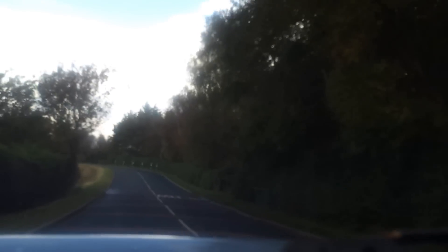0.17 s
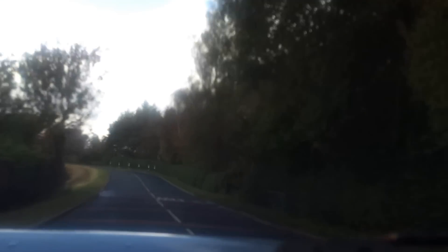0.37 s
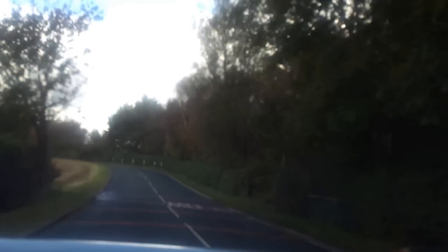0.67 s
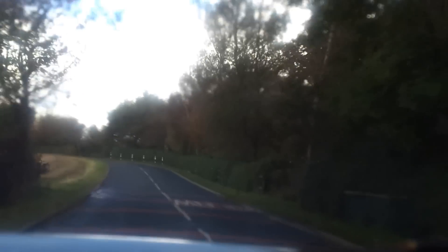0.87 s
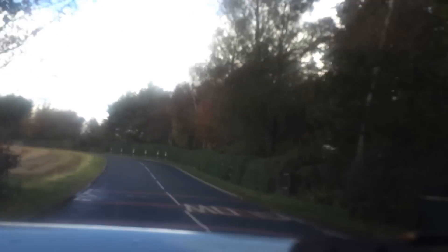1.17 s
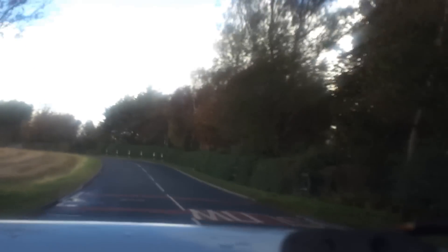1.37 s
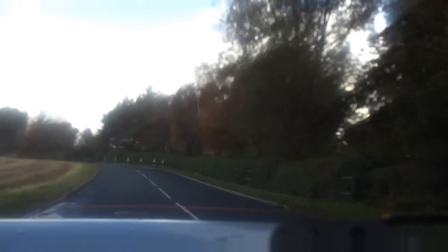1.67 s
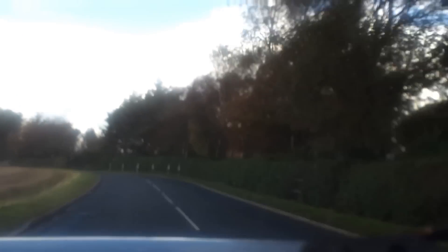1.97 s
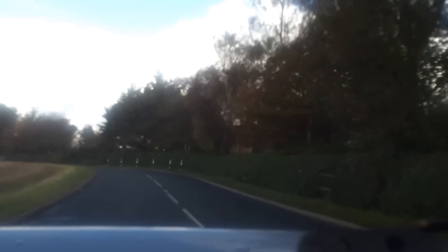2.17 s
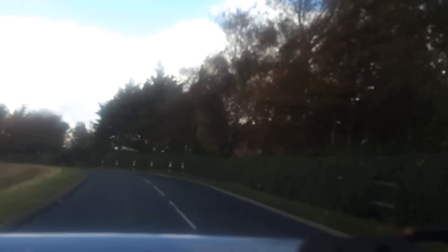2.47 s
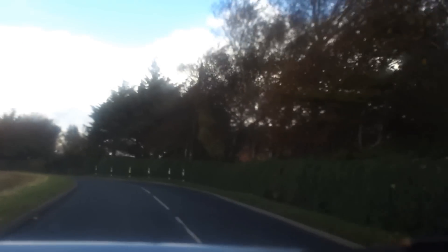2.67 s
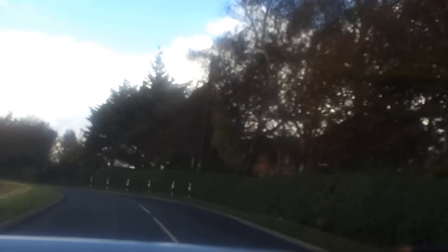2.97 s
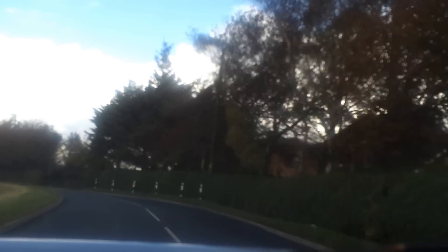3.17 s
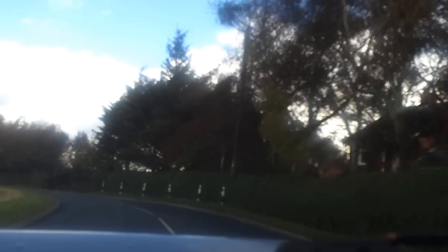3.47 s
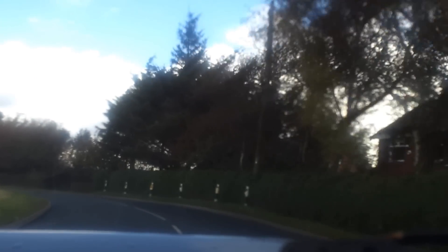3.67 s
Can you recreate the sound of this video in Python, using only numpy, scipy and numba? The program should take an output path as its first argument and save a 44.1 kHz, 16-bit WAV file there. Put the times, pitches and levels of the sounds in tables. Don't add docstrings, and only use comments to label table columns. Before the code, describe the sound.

Turbo air release inside a moving car: the engine pulls hard, a sagging whistle and hiss burst out, revs drop, the gearbox knocks, then steady cruising over tyre roar, heard by a camera microphone in the cabin.

```python
import sys
import numpy as np
from scipy import signal
from scipy.fft import rfft, irfft, next_fast_len
from scipy.io import wavfile
from scipy.ndimage import map_coordinates
from numba import njit

SR = 44100
rng = np.random.default_rng(int(sys.argv[2]) if len(sys.argv) > 2 else 0)


def invert_db(x):
    u = np.asarray(x, float) / 20
    return 10 ** u


def materialize(psi):
    bounded = np.clip(np.atleast_2d(psi).T, -1, 1)
    quanta = np.round(bounded * 32767).astype(np.int16)
    wavfile.write(sys.argv[1], SR, quanta)


N = 168903


@njit
def moving_bandpass(x, hz, width):
    y, b, l, g, k = np.empty(len(x)), 0., 0., 0., 0.
    for i in range(len(x)):
        if i == 0 or hz[i] != hz[i - 1]:
            g, k = np.tan(np.pi * hz[i] / SR), width / hz[i]
        v = (b + g * (x[i] - l)) / (1 + g * (g + k))
        b, l, y[i] = 2 * v - b, l + 2 * g * v, k * v
    return y


def unit(x):
    return x / np.sqrt(np.mean(x ** 2))


def curve(table, col=1):
    return np.interp(np.arange(N) / SR, [r[0] for r in table], [r[col] for r in table])


def at(table, hz):
    return np.interp(np.log(np.maximum(hz, 1)), np.log([r[0] for r in table]), [r[1] for r in table])


def walk(rate):
    place = np.arange(0, N + 64, 64) * rate / SR
    knots = map_coordinates(rng.standard_normal(1000), [place % 990], order=2)
    return np.interp(np.arange(N), place * SR / rate, knots)


def smooth_switch(s, fade):
    return .5 + .5 * np.tanh((np.arange(N) / SR - s) / fade)


# pitch in Hz, likeness from 0 to 1.
LIKENESS = [(30, .99), (220, .99), (310, .7), (600, .45), (1500, .55), (3000, .3), (8000, .25), (14000, .4)]


def ports(hz):
    c = np.clip(at(LIKENESS, hz), 0, 1)
    return np.sqrt([[(1 + c) / 2], [(1 - c) / 2]])


def band(hz, width, grain=1):
    hz, width = hz + np.zeros(N), 1. * width
    noise = rng.standard_normal((2, N)) * grain
    parts = [unit(moving_bandpass(moving_bandpass(s, hz, width), hz, width)) for s in noise]
    return np.array(parts) * ports(hz.mean())


# pitch in Hz, level in dB per Hz.
TYRE_ROAR = [(25, -20.5), (60, -8.5), (110, -10.5), (200, -4), (450, 0.5), (700, -4), (1000, -12),
             (1300, -6.5)]
# pitch in Hz, level in dB per Hz.
GLASS_WIND = [(1500, 2.5), (2200, 0.5), (3200, -7.5), (5000, -10.5), (7500, -5.5), (10000, -16.5),
              (11500, -19), (13000, -26)]
# time in seconds, roar in dB, bumpiness in dB, wind in dB.
ROAD_SURFACE = [(0, -1.5, -15, 2), (.5, 1, -10, -0.5), (.75, 0.5, -13, 2), (.89, 0, -3, 5.5),
                (1.0, 0.5, 3, 0), (1.6, 2, 1, 0), (2.1, 2.5, 4, 0), (2.7, -0.5, 5, -4.5),
                (3.0, -0.5, -8, -5), (3.83, 0.5, -11, -4.5)]


def roar(shape, level_db, patchy_db, spike_db, col):
    out, swell, hz = 0, walk(1.44), shape[0][0]
    grain = invert_db(spike_db * rng.exponential(size=N))
    bumps = curve(ROAD_SURFACE, col=2)
    while hz <= shape[-1][0]:
        bass_share = np.clip(1 - hz / 200, 0, 1)
        db = at(shape, hz) + 1.18 * swell + patchy_db * walk(9) + bumps * bass_share
        out = out + invert_db(db) * np.sqrt(hz) * band(hz, hz * 0.41, grain)
        hz *= 2 ** (1 / 3)
    return out / np.sqrt(np.mean(out ** 2) * 2) * invert_db(level_db + curve(ROAD_SURFACE, col=col))


# time in seconds, level in dB.
BOOST_RUSH = [(0, -39), (.15, -35), (.45, -37.5), (.78, -38), (.95, -43)]
# pitch in Hz, width in Hz, level in dB.
DUCT_NOTES = [(2220, 1060, 4), (3760, 2200, -0.5), (4700, 1000, -5.5), (6750, 8300, -1)]


def intake():
    rush = sum(invert_db(db + 0.85 * walk(9.0)) * band(hz, width) for hz, width, db in DUCT_NOTES)
    return invert_db(curve(BOOST_RUSH)) * rush


# peak in seconds, level in dB, rise in seconds, time to fall 60 dB in seconds, brightness in dB.
PUDDLES = [(1.768, -34, .002, .05, -2), (1.798, -32, .002, .07, 0), (1.83, -34, .01, .15, 5),
           (1.847, -31.5, 0.009, 0.15, 1), (1.782, -43, .003, .06, 10), (2.018, -36, .002, .04, -9),
           (2.05, -15.5, .0013, 0.027, 6), (2.061, -27.5, 0.0058, 0.09, 2), (2.135, -34, 0.011, 0.089, 1),
           (2.153, -32, 0.012, 0.19, -4), (2.415, -32, .003, .07, -5), (2.44, -35.5, .012, .1, 6),
           (2.461, -22.5, .0013, 0.021, 2), (2.47, -30.5, 0.0097, 0.093, -3), (2.485, -39, 0.0074, .07, -2),
           (2.507, -37, .003, .05, -8), (2.728, -33, .006, 0.078, -4), (2.757, -30.5, 0.0037, 0.094, 11),
           (2.769, -30, 0.006, .13, 1), (2.803, -36.5, 0.01, 0.08, -4), (3.164, -25.5, .0012, 0.031, 6),
           (3.175, -43, 0.0059, .15, 3)]


def splashes():
    t, dull, bright = np.arange(N) / SR, 0, 0
    for s, db, rise, t60, bright_db in PUDDLES:
        swell = np.exp(np.minimum(t - s, 0) / rise)
        tail = invert_db(-60 * np.maximum(t - s, 0) / t60)
        shape = invert_db(db) * np.where(t < s, swell, tail)
        dull = dull + shape * invert_db(-bright_db / 2)
        bright = bright + shape * invert_db(bright_db / 2)
    grain = invert_db(0.87 * rng.exponential(size=N))
    low_spray = band(4160, 3200, grain) + invert_db(4) * band(1420, 1600, grain)
    high_spray = band(7730, 5700, grain) + invert_db(-5.5) * band(12500, 5000, grain)
    return (dull * low_spray + bright * high_spray) * invert_db(1.2 * walk(200))


# start in seconds, level in dB, pitch in Hz, time to fall 60 dB in seconds.
KNOCKS = [(1.54, -3, 183, .2), (1.598, -2, 385, .18), (1.575, -12, 300, .15), (1.53, -16, 420, .2),
          (1.555, -10, 505, .2), (1.615, -10, 150, .3), (1.635, -7, 228, .25), (1.56, -11, 365, .15)]


def thuds():
    t, out = np.arange(N) / SR, 0
    for s, db, hz, t60 in KNOCKS:
        age = np.maximum(t - s, 0)
        soft_start = 1 - np.exp(-age / .015)
        out = out + invert_db(db - 60 * age / t60) * soft_start * np.sin(2 * np.pi * hz * age)
    return out


# pitch in Hz, width in Hz, level in dB.
CABIN_NOTES = [(119.2, 19, 4), (171.5, 12, 0), (202.4, 21, 3), (247.5, 35, 5), (416.8, 25, 3), (430, 30, 3)]


def cabin_db(hz):
    peaks = sum(invert_db(2 * db) / (1 + (2 * (hz - f) / w) ** 2) ** 2 for f, w, db in CABIN_NOTES)
    return 10 * np.log10(invert_db(2 * -4.5) + peaks)


# time in seconds, engine cycles per second (half the revs).
ENGINE_CYCLE = [(0, 41.7), (.71, 42), (.81, 43.5), (1.01, 39.2), (1.24, 36), (1.43, 32.4), (1.6, 29),
                (1.67, 30.5), (1.78, 29.3), (2.45, 29.85), (2.62, 30.1), (2.83, 29.5), (3.15, 28.8),
                (3.83, 29.3)]
# multiple of the cycle, level in dB.
PULL_BOOM = [(1, -32), (2, -39), (3, -20), (4, -14), (5, -1.5), (6, -19.5), (7, -17), (8, -15), (9, -13.5),
             (10, -14), (11, -13), (12, -14), (13, -14), (14, -22), (15, -29), (16, -16), (17, -20.5)]
# multiple of the cycle, level in dB.
COAST_BOOM = [(1, -25), (2, -21), (3, -5.5), (4, -1.5), (5, 0), (6, -7), (7, -5), (8, -7), (9, -30),
              (10, -14), (11, -10), (12, -4), (13, -16), (14, -7)]
# multiple of the cycle, level in dB.
CRUISE_BOOM = [(1, -35), (2, -25.5), (3, -25), (4, -6.5), (5, -5.5), (6, -23.5), (7, 0), (8, -3.5),
               (9, -17.5), (10, -16.5), (11, -20), (12, -11), (13, -19.5), (14, -17.5), (15, -10),
               (16, -18.5), (17, -13.5), (18, -27)]


def engine():
    cycle, out = curve(ENGINE_CYCLE), 0
    turn = 2 * np.pi * np.cumsum(cycle) / SR
    lift, clutch, bite = smooth_switch(.9, .02), smooth_switch(1.54, .025), smooth_switch(1.635, .012)
    gates = (1 - lift) * invert_db(-11.5), lift * (1 - clutch) * invert_db(-19.5), bite * invert_db(-16.5)
    booms = PULL_BOOM, COAST_BOOM, CRUISE_BOOM
    for k in range(1, len(CRUISE_BOOM) + 1):
        pull, coast, cruise = (g * invert_db(dict(boom).get(k, -60)) for g, boom in zip(gates, booms))
        wobble = 0.24 * (k / 7) ** 2 * walk(14) + 1.0 * rng.standard_normal()
        coast = coast * invert_db(cabin_db(k * cycle) + 1.5 * walk(18.2))
        size = np.sqrt(2) * (pull + cruise + coast) * invert_db(1.5 * k / 7 * walk(17))
        port_turn = np.array([[0], [1]]) * (1.84 + 1.7 * walk(7.2))
        out = out - size * ports(k * 33) * np.cos(k * turn + wobble + port_turn)
    return out


# start in seconds, start pitch in Hz, sag in Hz per second, width in Hz, level in dB,
# attack in seconds, time to fall 60 dB in seconds.
WHISTLES = [
    (.804, 6400, 1200, 150, -24, .008, .22),
    (.824, 6400, 4000, 280, -21, .005, .34),
    (.826, 6030, 3800, 380, -24, .028, .26),
    (.872, 5880, 200, 550, -29, .012, .6),
    (.872, 6350, 600, 600, -28.5, .012, .5),
]
# time in seconds, jet pitch in Hz, narrow jet in dB, broad hiss in dB.
ESCAPING_AIR = [
    (.8, 6600, -58, -44),
    (.84, 6600, -30, -27.5),
    (.91, 6900, -28, -25.5),
    (1.0, 7060, -36, -29),
    (1.1, 6960, -31, -32.5),
    (1.3, 6600, -34, -33),
    (1.5, 6560, -39, -37.5),
    (1.7, 6193, -47, -50),
]


def valve():
    t, out = np.arange(N) / SR, 0
    for s, hz, sag, width, db, rise, t60 in WHISTLES:
        age = np.clip(t - s, 0, .5)
        fall_db = 60 * np.maximum(age - rise, 0) / t60
        shape = np.clip(age / rise, 0, 1) * invert_db(db - fall_db + 0.81 * walk(109)) * (age < .5)
        pitch = hz - sag * age
        turn = 2 * np.pi * np.cumsum(pitch) / SR + 1.5 * walk(width / 2)
        port_turn = np.array([[0], [1]]) * (1.2 + walk(30))
        tone = np.sqrt(2) * ports(hz) * np.cos(turn + port_turn)
        breath = invert_db(-2) * band(pitch, 1.5 * width)
        out = out + shape * (tone + breath)
    jet = invert_db(curve(ESCAPING_AIR, col=2) + .8 * walk(40)) * band(curve(ESCAPING_AIR), 900)
    hiss = band(6400, 9300) + invert_db(-6.5) * band(2060, 1300)
    is_open = (t > ESCAPING_AIR[0][0]) * (t < ESCAPING_AIR[-1][0])
    return out + (jet + invert_db(curve(ESCAPING_AIR, col=3)) * hiss) * is_open


# pitch in Hz, left minus right in dB.
PORT_LEAN = [(30, 3.5), (200, 5.5), (400, -0.5), (800, -0.3), (1500, -0.5), (3000, -1.2), (6000, -3),
             (12000, 2)]


def microphone(shared, opposed):
    size = next_fast_len(N + SR // 10)
    hz = np.arange(size // 2 + 1) * SR / size
    lean = invert_db(at(PORT_LEAN, hz) / 2)
    top = invert_db(-7 * (1 - 1 / (1 + (hz / 10900 / 1.075) ** 14)))
    lag = np.exp(-2j * np.pi * hz * 16 / SR)
    left = rfft(shared + opposed, size) * lean * lag
    right = rfft(shared - opposed, size) / lean
    return irfft(top * np.array([left, right]), size)[:, :N]


def scene():
    background = roar(TYRE_ROAR, -15.5, 1.47, 1.94, col=1) + roar(GLASS_WIND, -32, 1.8, 2.2, col=3)
    shared, opposed = background + intake() + splashes() + engine() + valve()
    return microphone(shared + thuds(), opposed)


def drop_faint_treble(x):
    lead = 744
    padded = np.pad(x, ((0, 0), (lead, 2048)), "reflect")
    hz, _, z = signal.stft(padded, SR, "cosine", 2048, 1024)
    edges = np.arange(np.searchsorted(hz, 11000), len(hz), 3)
    chance, keep = rng.standard_normal((200, z.shape[2])), np.ones(z.shape[1:])
    for k, e in enumerate(edges):
        db = 10 * np.log10(np.mean(np.abs(z[:, e:e + 3]) ** 2, axis=(0, 1)) + 1e-20)
        keep[e:e + 3] = db + 4.5 * chance[k] > -76 + min(.3 * k, 11)
    return signal.istft(z * keep, SR, "cosine", 2048, 1024)[1][:, lead:lead + N]


def band_limit(x):
    return signal.sosfilt(signal.butter(12, 14960, fs=SR, output="sos"), x)


def record(dry):
    rounded = np.clip(np.tanh(.5 * dry) / .5, -1, 1)
    return band_limit(drop_faint_treble(rounded))


dry = scene()
out = record(dry)
materialize(out)
```